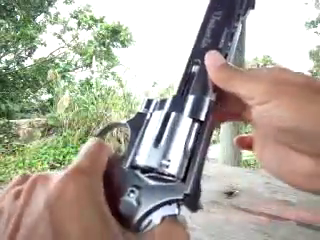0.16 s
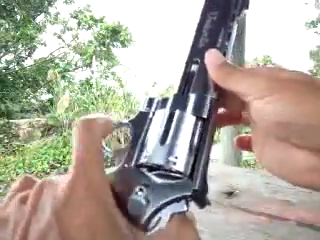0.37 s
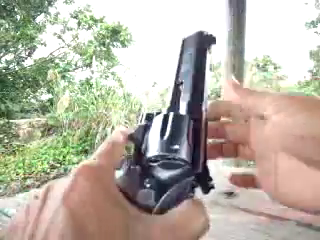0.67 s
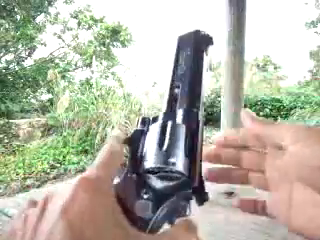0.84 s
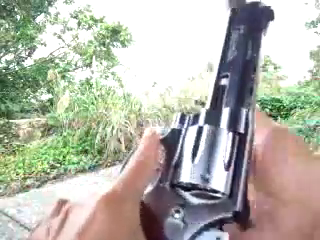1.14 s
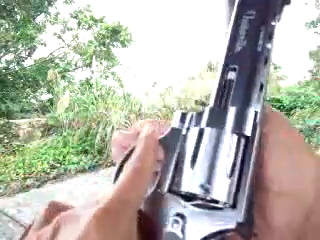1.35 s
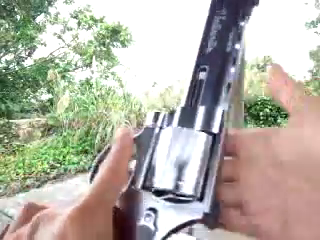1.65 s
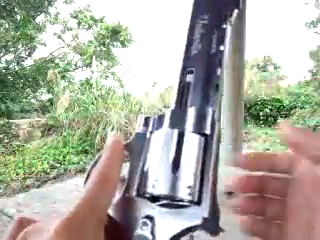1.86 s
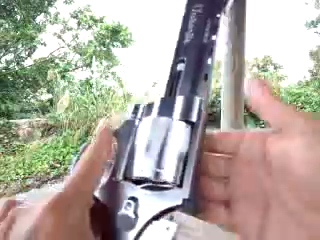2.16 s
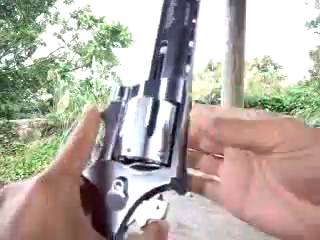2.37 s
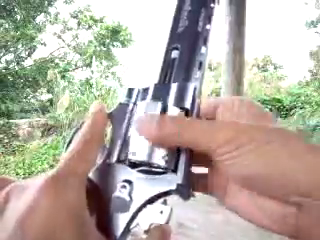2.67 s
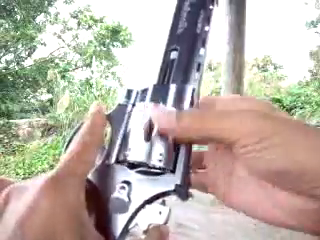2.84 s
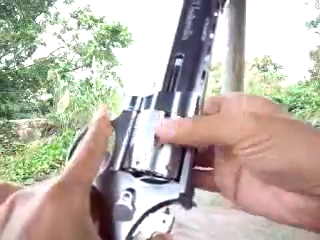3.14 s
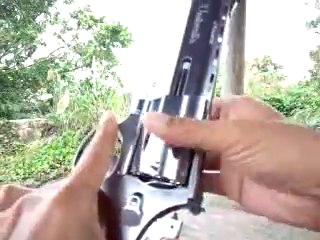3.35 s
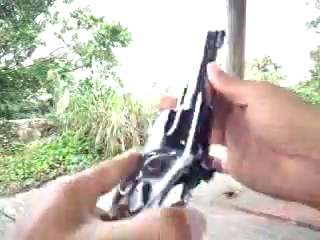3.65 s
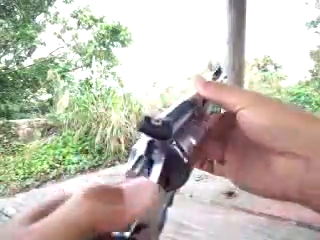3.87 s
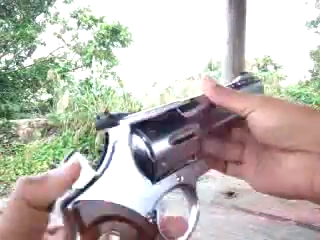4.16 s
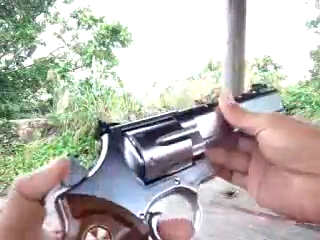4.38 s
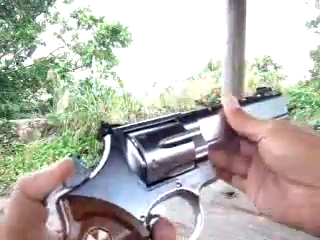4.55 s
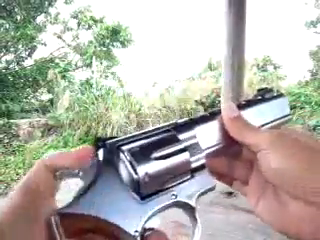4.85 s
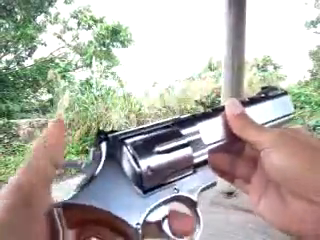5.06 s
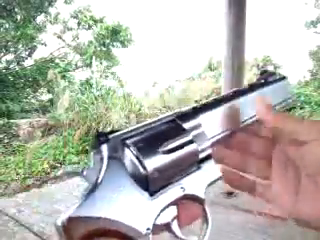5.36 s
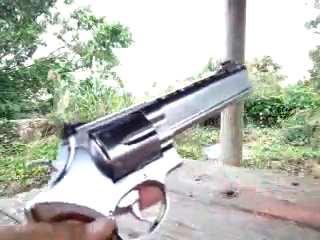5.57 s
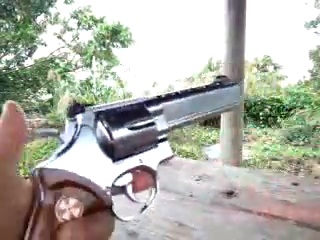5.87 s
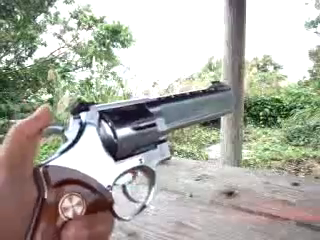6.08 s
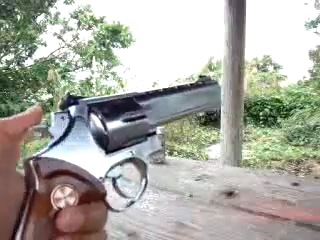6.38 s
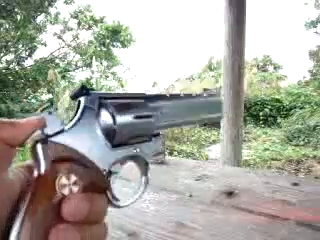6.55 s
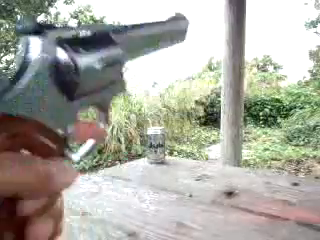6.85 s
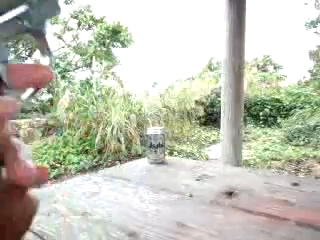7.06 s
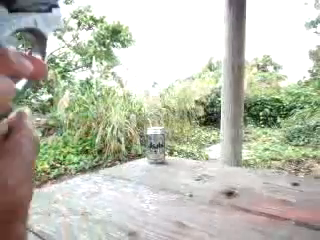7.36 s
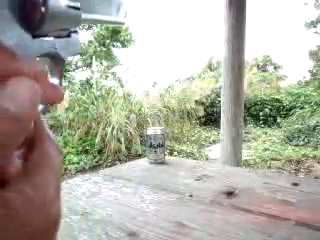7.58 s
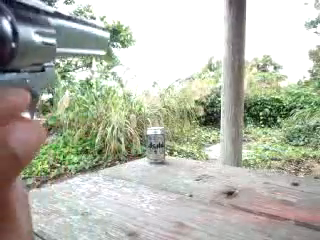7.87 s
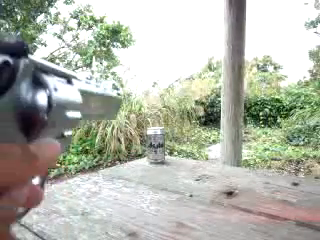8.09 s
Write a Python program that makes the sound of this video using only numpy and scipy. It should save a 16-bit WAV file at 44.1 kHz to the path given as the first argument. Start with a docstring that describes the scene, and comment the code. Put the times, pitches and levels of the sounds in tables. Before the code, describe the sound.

A revolver is handled close to the microphone under a porch roof. A few hard steel clicks come first, then two quick runs of ratchet ticks as the cylinder spins. Three separate sharp snaps follow, and later the hammer clacks several times as it is cocked and let down. Behind it, a distant engine drones faintly, leaves hiss and an insect gives short, high rasps.

```python
"""Short, hard clicks of a gas revolver being handled close by, at a table under a porch roof.
The cylinder ratchets round and latches, the hammer is cocked and let down; each blow rings the steel.
Behind it a far engine drones, leaves hiss in the breeze and an insect rasps its wings now and then.
A limiter (an automatic volume control) turns all of this down briefly after each loud click."""
import sys
import numpy as np
from scipy import signal
from scipy.fft import rfft, irfft, next_fast_len
from scipy.io import wavfile
from scipy.ndimage import uniform_filter1d, minimum_filter1d

SR = 44100
rng = np.random.default_rng(int(sys.argv[2]) if len(sys.argv) > 2 else 0)


def digitize_waveform(pressure):
    """Quantize a signal to 16-bit integers and store it at the path in sys.argv[1].

    Rows of a 2-D input are taken as channels; values are limited to [-1, 1].
    """
    field = np.atleast_2d(pressure).T
    bounded = np.clip(field, -1, 1)
    quanta = np.round(bounded * 32767).astype(np.int16)
    wavfile.write(sys.argv[1], SR, quanta)


N = 362502

# how strongly the ratchet rings the gun's low and high tones: (frequency [Hz], boost [dB])
RATCHET_COLOUR = [(900, -7), (2300, 2.5), (3900, 0), (5300, -1), (6800, 3)]


def amp(db):
    """Turns decibels into a number to multiply a sound by."""
    return 10 ** (np.asarray(db) / 20)


def unit(x):
    """Scales x to an average (rms) level of 1."""
    return x / np.sqrt(np.mean(x ** 2) + 1e-20)


def add(mix, start_s, sound):
    """Mixes a sound in at the given time."""
    part = mix[max(round(start_s * SR), 0):][:len(sound)]
    part += sound[:len(part)]


def shaped(x, spectrum):
    """Filters x to follow (frequency [Hz], level [dB]) points, at an average level of 1."""
    size = next_fast_len(len(x), True)
    hz, db = np.transpose(spectrum)
    bin_hz = np.fft.rfftfreq(size, 1 / SR)
    gain = amp(np.interp(np.log(bin_hz + 1), np.log(hz + 1), db))
    return unit(irfft(rfft(x, size) * gain, size)[:len(x)])


def wander(count):
    """A slow drift: straight lines through count random points."""
    return np.interp(np.arange(N), np.linspace(0, N, count), rng.standard_normal(count))


def loudness(x):
    """The running (rms) level of x, averaged over 1.5 ms."""
    return np.sqrt(abs(uniform_filter1d(x ** 2, size=66)) + 1e-14)


def ring(push, hz, t60):
    """One tone set ringing by push; it fades by 60 dB in t60 seconds."""
    decay = np.exp(-np.log(1000) / (t60 * SR))
    feedback = [1, -2 * decay * np.cos(2 * np.pi * hz / SR), decay ** 2]
    return signal.lfilter([1, 0, -1], feedback, push)


def far_engine(pitch_waver=0.005, throb_db=3.5, eases_off_s=(1.2, 1.9)):
    """A far engine drones: a low rumble plus wavering tones that change as it eases off."""
    # the rumble: (frequency [Hz], level [dB])
    rumble = [(20, -26), (80, -19), (112, -38), (140, -17.5), (180, -6.5), (260, -2), (380, -5),
              (550, -10.5), (900, -13.5), (1500, -19.5), (3000, -23.5), (6000, -44)]
    # the tones: (frequency [Hz], level against the rumble [dB], change while working hard [dB])
    tones = [(192.8, -13, 4.5), (288.5, -14.5, 7), (385.4, -16.5, 2), (482.4, -13, -2), (580, -16.5, 0)]
    # the whole drone fades slowly: (time [s], level [dB])
    fade = [(0.25, -33.5), (0.65, -37.5), (2.2, -35), (3.3, -35.5), (4.4, -36), (5.7, -36.5), (7.3, -38.5),
            (8.15, -38.5)]
    t = np.arange(N) / SR
    wavering_time = np.cumsum(1 + pitch_waver * wander(count=50)) / SR
    drone = shaped(rng.standard_normal(N), rumble)
    effort = np.interp(t, eases_off_s, [1, 0])
    for hz, db, effort_db in tones:
        tone_db = db + effort_db * effort + throb_db * wander(count=40)
        phase = 2 * np.pi * (hz * wavering_time + rng.random())
        drone += amp(tone_db) * np.sqrt(2) * np.sin(phase)
    return amp(np.interp(t, *np.transpose(fade))) * unit(drone)


def leaves(flutter_db=1.1):
    """Leaves hiss and flutter, louder when the breeze picks up."""
    # the hiss: (frequency [Hz], level [dB])
    spectrum = [(200, -23), (700, -9), (1500, -9.5), (3000, -8.5), (4500, -6), (5200, -2.5), (5850, 1),
                (6500, -4), (7200, -9.5), (7550, -24), (7900, -54.5), (9000, -52.5)]
    # a light breeze, then two gusts: (time [s], level [dB])
    breeze = [(0.55, -42.5), (1.57, -41.3), (2.17, -37), (3.0, -38), (3.45, -41.5), (3.8, -38),
              (4.55, -41.5), (4.78, -39.5), (5.48, -40.5), (5.7, -35.5), (6.08, -33), (6.25, -36.5),
              (6.47, -41), (6.95, -29.5), (7.18, -35.5), (7.45, -32.5), (7.8, -39.3), (8.15, -38)]
    breeze_db = np.interp(np.arange(N) / SR, *np.transpose(breeze))
    flutter = amp(flutter_db * wander(count=200))
    return amp(breeze_db) * flutter * shaped(rng.standard_normal(N), spectrum)


def insect(teeth_per_s=3000, swell_share=0.35, uneven_db=1.0, wing_db=-7, trim_db=-1.0):
    """Tiny teeth strike a ringing wing in a quick, uneven run; each chirp swells and dies away."""
    # the chirps: (time [s], level [dB], length [s])
    chirps = [(0.116, -35, 0.028), (1.632, -20, 0.09), (2.408, -21, 0.066), (2.646, -38.5, 0.06),
              (3.384, -19.5, 0.066), (3.88, -21.5, 0.074), (4.821, -20.5, 0.069), (5.534, -19, 0.048),
              (6.54, -21.5, 0.099), (7.266, -18, 0.068)]
    # the rasp of the teeth: (frequency [Hz], level [dB])
    rasp = [(600, -54), (1500, -26), (2200, -18.5), (3700, -19), (4400, -8), (5400, -1.5), (6000, -4),
            (6500, -14.5), (7200, -29.5), (8000, -51)]
    out = np.zeros(N)
    t = np.arange(SR // 4) / SR
    for start_s, db, length_s in chirps:
        age = t / (swell_share * length_s)  # 1 at the top of the swell
        swell = age * np.exp(1 - age)
        strikes = (rng.random(len(t)) < teeth_per_s / SR) * rng.choice([-1, 1], len(t))
        teeth = strikes * amp(uneven_db * rng.standard_normal(len(t)))
        wing = amp(wing_db) * unit(ring(teeth, hz=5740, t60=0.11))
        add(out, start_s, amp(db + trim_db) * swell * (shaped(teeth, rasp) + wing))
    return out


def porch(x, tail_db=-13, t60=0.22, build_s=0.017):
    """Sound bounces off the table and the roof, then blurs into a short, noisy tail."""
    # the tail: (frequency [Hz], level [dB])
    spectrum = [(100, -35), (400, -17.5), (1000, -13), (2000, -8.5), (3300, -6.5), (3800, -6), (4800, -5.5),
                (6000, -1), (6900, -2), (7500, -4.5), (9000, -15)]
    t = np.arange(SR // 2) / SR
    decay = (np.minimum(t / build_s, 1) * np.exp(-np.log(1000) * t / t60)) ** 2
    energy = abs(signal.oaconvolve(x ** 2, decay / decay.sum())[:N])
    out = x + amp(tail_db) * np.sqrt(energy) * shaped(rng.standard_normal(N), spectrum)
    add(out, 0.0028, amp(-16) * x)  # echo from the table
    add(out, 0.014, amp(-21) * x)  # echo from the roof
    return out


def hand_jolt(start_s=2.768, db=-26, rise_s=0.0015):
    """One soft, low bump with no ring."""
    age = np.maximum(np.arange(N) / SR - start_s, 0) / rise_s
    return -amp(db) * age * np.exp(1 - age)


def steel_ring(push, colour, heft_db=0, tilt_db=0, heft_hz=1870, pivot_hz=5300, detune=0.021):
    """A push rings the gun's own tones. Heft boosts the low ones; tilt favours high over low."""
    # the tones of frame, cylinder and barrel: (frequency [Hz], level [dB], ring time [s])
    tones = [(835, -27.5, 0.0048), (1390, -20, 0.0076), (1820, -15.5, 0.004), (2540, -12.5, 0.0056),
             (2750, -10.5, 0.015), (3870, -10, 0.0072), (4460, -8, 0.0055), (4935, -3.5, 0.0061),
             (5440, -3, 0.013), (5833, 1.5, 0.0097), (6346, 3.5, 0.0095), (6697, 1, 0.0048),
             (7400, -27, 0.0093)]
    sound = np.zeros(len(push))
    for k, (hz, db, t60) in enumerate(tones):
        db += np.interp(hz, *np.transpose(colour))
        db += heft_db / (1 + (hz / heft_hz) ** 4)
        db += tilt_db * np.log2(hz / pivot_hz)
        gripped_hz = hz * (1 + detune * rng.standard_normal())  # the grip shifts each tone a little
        direction = (-1) ** k  # neighbouring tones swing opposite ways
        sound += direction * amp(db) * unit(ring(push, gripped_hz, t60))
    return sound


def click(db, colour, contact_s, heft_db=0, tilt_db=0, chatter=0.46, crack_db=-11):
    """A steel part snaps home and chatters for a moment, ringing the gun."""
    age = np.arange(1024) / SR / contact_s
    push = chatter * age * np.exp(1 - age) * rng.standard_normal(len(age))
    push[0] += 1  # the first hit
    crack = amp(crack_db) * unit(signal.lfilter([1, 0, -1], 1, push))  # bright sound of the contact
    sound = crack + steel_ring(push, colour, heft_db, tilt_db)
    return amp(db) * sound / loudness(sound).max()


def finger_taps():
    """Fingers shift on the gun and tap its loose parts."""
    # the taps: (time [s], level [dB])
    taps = [(0.189, -30.5), (0.3038, -25.5), (2.2319, -20), (4.0292, -18), (4.6202, -29.5), (4.984, -31),
            (6.534, -21), (6.62, -20), (7.035, -25), (7.074, -30)]
    # a tap favours the low tones: (frequency [Hz], boost [dB])
    colour = [(900, 17.5), (2300, 5), (3900, 5), (5300, -2.5), (6800, -9.5)]
    out = np.zeros(N)
    for start_s, db in taps:
        add(out, start_s, click(db, colour, contact_s=0.0012))
    return out


def scrape(length_s, db=-20.5, slips_per_s=1500, uneven_db=4):
    """The ratchet's lever slides up the next tooth in tiny, uneven slips."""
    count = round(length_s * SR)
    slips = (rng.random(count) < slips_per_s / SR) * amp(uneven_db * rng.standard_normal(count))
    return amp(db) * unit(steel_ring(slips, RATCHET_COLOUR))


def ratchet(spin_gap_s=0.06):
    """As the cylinder spins, a small lever ticks over its teeth and scrapes between close ticks."""
    # the ticks: (time [s], level [dB])
    ticks = [(1.7635, 3), (1.791, 4.5), (1.8149, 0.5), (1.8397, 7), (1.877, 8), (2.2914, 9), (2.325, 5.5),
             (2.3606, 8)]
    out = np.zeros(N)
    for start_s, db in ticks:
        add(out, start_s, click(db, RATCHET_COLOUR, contact_s=0.00047))
    for (start_s, _), (next_s, _) in zip(ticks, ticks[1:]):
        if next_s - start_s < spin_gap_s:
            add(out, start_s, scrape(next_s - start_s))
    return out


def latches(contact_s=0.00029):
    """A catch springs into its notch with a sharp snap; this table also holds the first ratchet tick of the
    second spin, at 2.245 s."""
    # the snaps, and the first ratchet tick of the second spin at 2.2446 s: (time [s], level [dB], heft [dB],
    # tilt [dB per octave])
    snaps = [(0.3328, -0.5, -0.5, -4.5), (0.3717, -8, 0, -1), (1.7186, -15, 5, 1), (1.7272, 3.5, 7.5, -1),
             (2.2446, 4, 1, -2), (2.7691, 5.5, -13, -1.5), (3.0607, 6, -6, -1), (3.444, 7.5, 2, 1.5),
             (3.9681, -6, -11, 1), (5.107, -14, 2, 0)]
    # how strongly a snap rings the gun's tones: (frequency [Hz], boost [dB])
    colour = [(900, -1), (2300, 5.5), (3900, -0.5), (5300, 0), (6800, 0.5)]
    out = np.zeros(N)
    for start_s, db, heft_db, tilt_db in snaps:
        add(out, start_s, click(db, colour, contact_s, heft_db, tilt_db))
    return out


def knocks():
    """The hammer and the cylinder knock against the frame."""
    # the blows: (time [s], level [dB], heft [dB], tilt [dB per octave], contact time [s])
    blows = [(0.3764, 1, -12, -3, 0.00061), (0.3798, -3, -7, -1, .001), (4.0522, 2, 0, 0.5, 0.00032),
             (4.0601, 1, 5, -0.5, 0.00048), (4.6612, -10.5, -9.5, -4.5, 0.0012),
             (5.1177, 2.5, 9, 6, 0.00089), (5.1246, -4.5, -2, -3, 0.002), (5.132, 8, -0.5, 0, 0.0011),
             (6.589, -2.5, -13.5, -2, 0.00046), (6.6417, 3.5, -15, -4.5, 0.00035),
             (6.6528, 3.5, -9.5, -7, 0.00026)]
    # how strongly a blow rings the gun's tones: (frequency [Hz], boost [dB])
    colour = [(900, 8.5), (2300, 1.5), (3900, 7), (5300, 2), (6800, -4.5)]
    out = np.zeros(N)
    for start_s, db, heft_db, tilt_db, contact_s in blows:
        add(out, start_s, click(db, colour, contact_s, heft_db, tilt_db))
    return out


def scene():
    """The gun under the porch roof, with the insect, engine and leaves behind it, in mono."""
    revolver = ratchet() + latches() + knocks() + finger_taps()
    return (porch(revolver) + hand_jolt() + insect() + far_engine() + leaves())[None]


def limiter(x, ceiling_db=-6.5, hold_s=0.097, recover_db_per_s=62, attack_s=0.00012):
    """The volume drops quickly on a loud click, stays down a moment, then climbs back."""
    over_db = np.maximum(20 * np.log10(loudness(x)) - ceiling_db, 0)
    span = 2 * int(hold_s * SR / 2) + 1
    held_db = -minimum_filter1d(-over_db, span, origin=span // 2)  # biggest recent overshoot
    climb_db = np.arange(N) / SR * recover_db_per_s
    cut_db = np.maximum.accumulate(held_db + climb_db) - climb_db  # lets go at a steady rate
    lag = np.exp(-1 / (attack_s * SR))
    smooth_cut_db = signal.lfilter([1 - lag], [1, -lag], cut_db)
    return x / amp(smooth_cut_db)


def record(dry, roll_off_hz=7500, max_peak=0.89, cut_hz=8500):
    """A small recorder dulls the treble, limits loud clicks, rounds off peaks and cuts the top."""
    dull = signal.sosfilt(signal.butter(8, roll_off_hz, fs=SR, output="sos"), dry[0])
    limited = limiter(dull)
    rounded = limited / (1 + (limited / max_peak) ** 12) ** (1 / 12)
    treble_cut = signal.firwin(101, cut_hz, window=("kaiser", 8), fs=SR)
    return signal.oaconvolve(rounded, treble_cut, "same")[None]


dry = scene()
out = record(dry)
digitize_waveform(out)
```